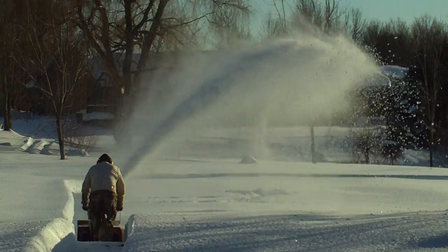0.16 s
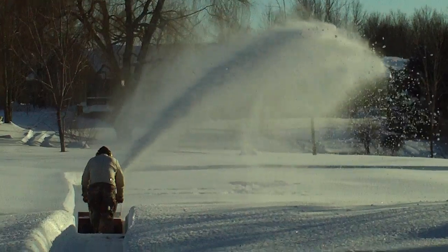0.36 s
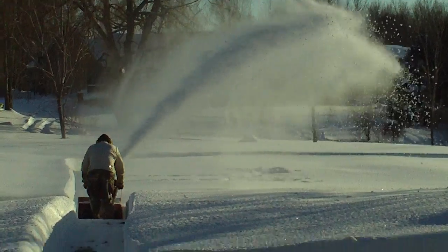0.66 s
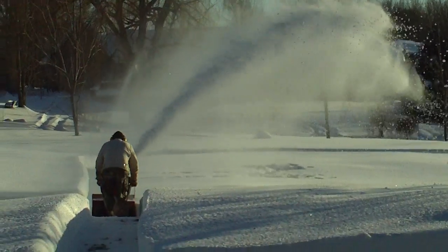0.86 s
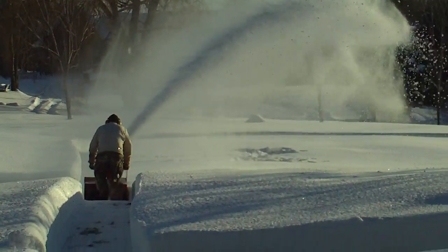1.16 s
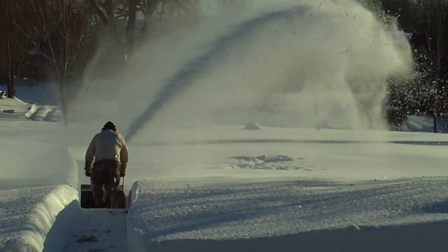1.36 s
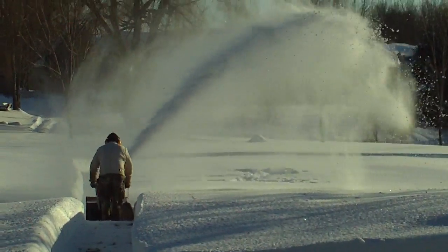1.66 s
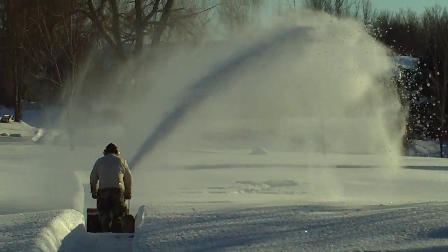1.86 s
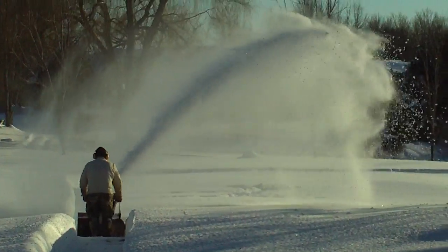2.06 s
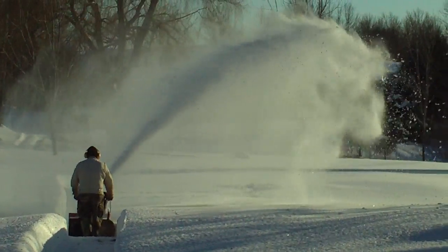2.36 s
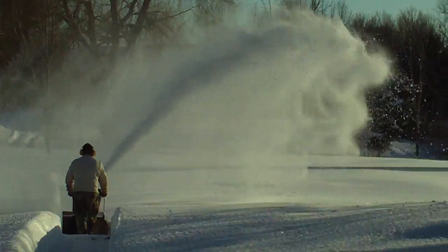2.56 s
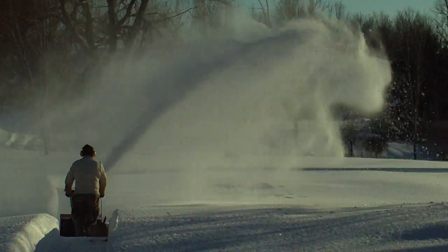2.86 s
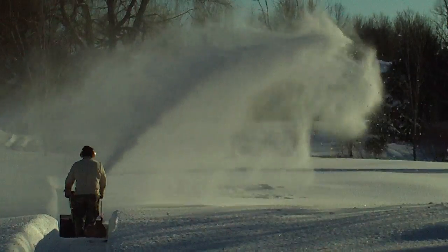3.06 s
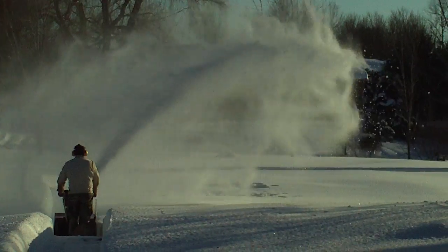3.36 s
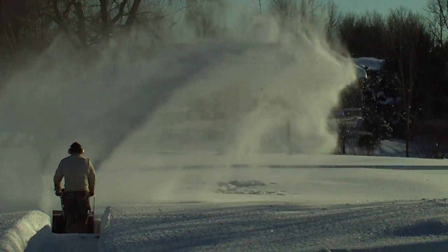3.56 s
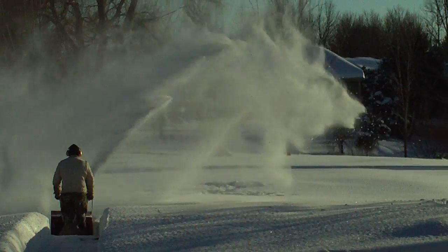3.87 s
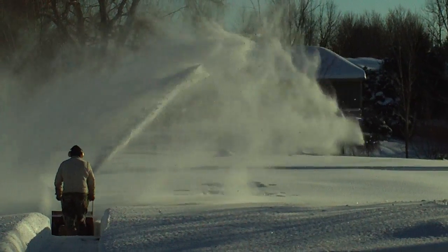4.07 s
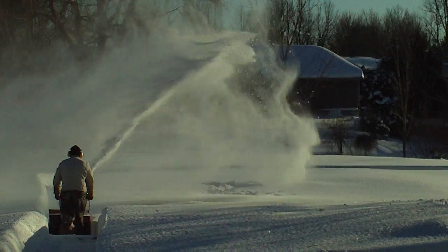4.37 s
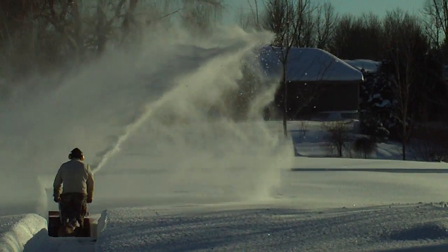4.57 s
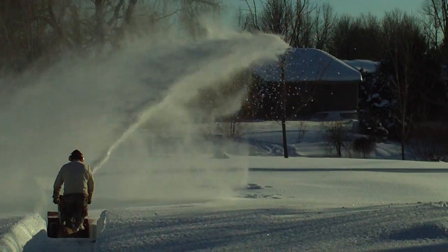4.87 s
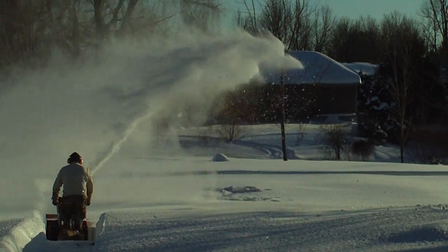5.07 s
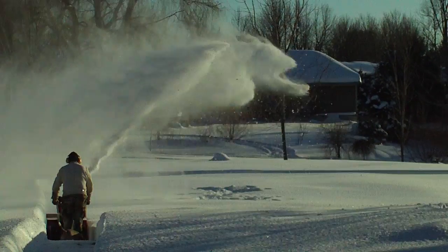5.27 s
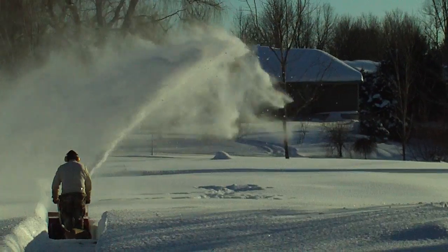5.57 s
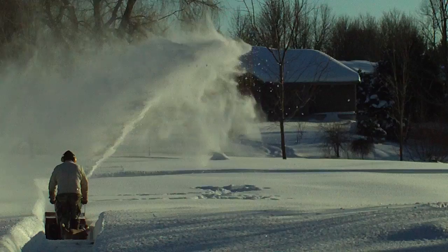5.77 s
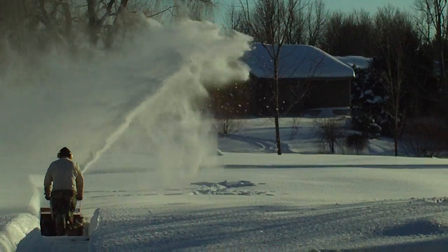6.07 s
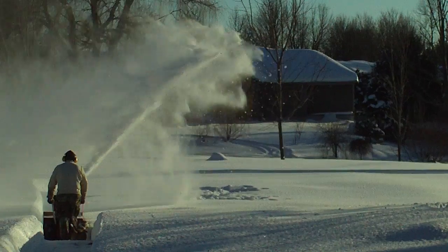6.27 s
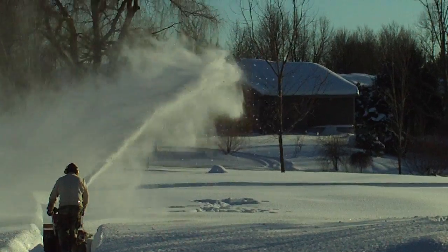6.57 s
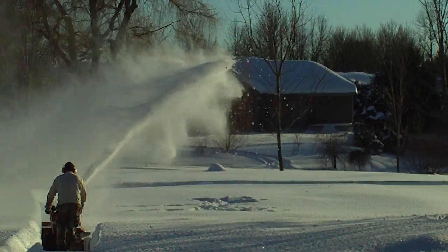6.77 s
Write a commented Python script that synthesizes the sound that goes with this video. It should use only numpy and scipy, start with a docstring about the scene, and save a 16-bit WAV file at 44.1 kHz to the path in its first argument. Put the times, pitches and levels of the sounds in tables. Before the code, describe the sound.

A snowblower's small petrol engine drones steadily, churning and spraying snow, with two sharp close clicks early on and light wind gusts.

```python
"""A throbbing engine drone is heard first: a walk-behind snowblower, some way off in a snowy yard.
Its one-cylinder four-stroke engine excites the resonances of a muffler, its fan whines and its impeller
beats against the exhaust note. The auger churns; snow hisses from the chute and ice pings its steel.
Close by, light gusts rumble, a metal catch clicks, something rustles and a plastic casing snaps."""
import sys
import numpy as np
from scipy import signal
from scipy.fft import rfft, irfft, next_fast_len
from scipy.io import wavfile
from scipy.ndimage import uniform_filter1d

SR = 44100
rng = np.random.default_rng(int(sys.argv[2]) if len(sys.argv) > 2 else 0)


def unload_audio(sound):
    """Save the sound as a 16-bit wav file, at the path given as the first command line argument."""
    columns = np.transpose(np.atleast_2d(sound))
    # keep every value between -1 and 1, then stretch to whole-number steps
    steps = np.round(np.clip(columns, -1, 1) * 32767)
    wavfile.write(sys.argv[1], SR, steps.astype(np.int16))


N = 305613
TIME = np.arange(N) / SR

# engine speed, dipping and recovering with the load: (time [s], firing rate [Hz])
ENGINE_SPEED = [(0.0, 26.423), (0.45, 27.355), (0.83, 26.705), (0.98, 27.152), (3.6, 27.729),
                (3.74, 28.136), (4.0, 27.39), (4.44, 27.822), (5.43, 27.656), (5.58, 27.85), (6.93, 27.831)]
# low exhaust harmonics: (multiple of the firing rate [-], level [dB])
THUD_HARMONICS = [(1, -42.5), (2, -35.5), (3, -64.5), (4, -39.5), (5, -37.5)]
# upper exhaust harmonics: (multiple of the firing rate [-], relative level [dB])
DRONE_HARMONICS = [(6, -45), (7, -49), (8, -40), (9, -47), (10, -62.5), (11, -49), (12, -53.5), (13, -59.5),
                   (15, -58)]
# gain of those upper harmonics: (time [s], gain [dB])
DRONE_GAIN = [(0, 0), (1.1, -2.5), (1.95, 1), (2.7, -2), (3.8, 0), (4.15, -4.5), (4.9, -1), (5.45, -3.5),
              (5.72, 1), (6.3, -2), (6.93, -2)]
# firings that pop harder than the rest: (time [s], relative level of the extra pop [dB])
EXTRA_POPS = [(.608, -8.5), (2.771, 3), (2.88, -9), (2.917, -3), (4.07, -6.5), (4.145, 0), (5.323, 5.5),
              (5.694, 6), (6.341, 3.5), (6.412, 1), (6.915, -4)]
# how hard the exhaust barks under load: (time [s], bark index [-])
EXHAUST_BARK = [(0.0, -41.5), (0.91, -38), (1.81, -46.5), (2.04, -41.5), (2.6, -42), (2.94, -38),
                (3.08, -43), (3.22, -42.5), (3.37, -43.9), (3.81, -42), (4.08, -44), (4.81, -47),
                (5.39, -39), (5.84, -46.5), (5.99, -40.5), (6.64, -43.5), (6.93, -26)]
# rushing gas: (frequency [Hz], gain [dB])
RASP_SPECTRUM = [(700, -18.5), (1300, 1.5), (2400, -6), (4000, -16), (5500, -14), (6500, -37)]
# muffler resonances: (frequency [Hz], bandwidth [Hz], gain [dB])
MUFFLER_MODES = [(944, 50, 1), (873.4, 81, 2), (690, 810, -7.5), (1060, 110, -19)]
# muffler transmission: (frequency [Hz], gain [dB])
MUFFLER_SPECTRUM = [(300, -8.0), (700, 3.0), (1100, 0.5), (1600, -16.5), (3000, -8.0), (6000, -60)]
# fan whine: (time [s], level [dB])
FAN_LEVEL = [(0, -53.5), (.6, -47), (1.2, -50), (1.9, -54.5), (2.4, -40.5), (2.65, -46.5), (2.95, -40),
             (3.2, -43), (3.4, -56), (3.75, -41.5), (4.05, -52), (4.8, -44.5), (5.3, -46.5), (5.62, -49.5),
             (6.08, -42.5), (6.45, -46.5), (6.7, -47.5), (6.9, -48)]
# piston and valve knocks: (place in the cycle [turns], relative level [dB])
VALVE_KNOCKS = [(0.91, -6), (0.5, 1), (.7, 2), (1, -11.5)]
# their metallic clatter: (frequency [Hz], gain [dB])
CLATTER_SPECTRUM = [(600, -22), (1300, 11.5), (2700, 8), (3200, 3), (3750, 10), (4300, 3), (5400, 7),
                    (5750, -7), (6100, -7), (6450, -15), (6800, -33)]
# impeller tone: (multiple of the blade rate [-], level [dB])
IMPELLER_HARMONICS = [(1, -39), (2, -85), (3, -63.5)]
# churning snow: (frequency [Hz], gain [dB])
CHURN_SPECTRUM = [(10, -2.5), (22, -0.5), (42, -3), (62, -1.5), (90, -7.5), (180, -3.5), (260, -4),
                  (335, -3), (400, -9), (480, -9), (560, -18.5), (750, -12.5), (1200, -20), (2500, -50)]
# bites into packed snow: (time [s], level [dB], half-width [s])
AUGER_BITES = [(2.303, -42.5, 0.13), (3.977, -41, 0.058), (5.694, -39, 0.041), (6.832, -46, 0.13)]
# snow leaving the chute, swelling as the auger bites: (time [s], flow index [-])
SNOW_FLOW = [(0, 1), (2.15, -1.5), (3, 5), (4.9, 2), (6.03, 6), (6.5, 0.5), (6.76, 2), (6.93, 8)]
# hiss of thrown snow: (frequency [Hz], gain [dB])
SPRAY_SPECTRUM = [(400, -8), (1100, 4), (1500, 2.5), (2200, 2.5), (2900, -2), (3150, -3.5), (3550, -5),
                  (3750, -4), (4200, -5.5), (5000, -3.5), (5650, -16), (6100, -19.5), (6450, -29),
                  (6900, -37)]
# sheet steel of the chute: (frequency [Hz], bandwidth [Hz], relative level [dB])
CHUTE_MODES = [(2040, 110, -8.5), (2830, 60, 5.5), (3760, 160, 4.5), (5015, 160, 3.5), (5420, 230, 5.5)]
# ice in the thrown snow: (time [s], relative level [dB])
ICE_LEVEL = [(0, -52.5), (.17, -51), (.48, -53.5), (1.2, -58.5), (1.65, -53.5), (2.18, -58.5), (2.36, -55),
             (2.98, -52), (3.4, -52.5), (3.9, -56.5), (4.08, -56), (4.5, -66), (4.9, -63), (5.2, -60),
             (5.55, -57.5), (5.97, -51), (6.55, -61), (6.9, -53)]
# tone colour of its pings: (frequency [Hz], gain [dB])
ICE_SPECTRUM = [(1000, -9.5), (2000, 0.5), (5700, 0.5), (6200, -25.5), (7000, -25.5)]
# stronger gusts: (time [s], relative level [dB], half-width [s])
GUST_SWELLS = [(0.163, -31, 0.11), (0.65, -25.5, 0.053), (0.808, -28.5, 0.18), (1.428, -26, 0.071),
               (2.432, -26.5, 0.015), (2.747, -24.5, 0.018), (3.38, -22, 0.032), (4.055, -24.5, 0.037),
               (5.967, -26.5, 0.038), (6.632, -30, 0.059), (6.808, -32, 0.087)]
# wind eddies: (frequency [Hz], gain [dB])
EDDY_SPECTRUM = [(4, -19.5), (14, 4), (30, -4.5), (60, -8.5), (130, -12), (300, -33), (900, -63.5)]
# their rumble: (frequency [Hz], gain [dB])
RUMBLE_SPECTRUM = [(100, 2.5), (400, -1.5), (1200, -47.5)]
# click, rebound and rattle of the catch: (time [s], gain [dB], relative push [dB])
CATCH_BLOWS = [(.8568, -16.5, 10), (.8585, -33, -6), (.877, -40, 3), (.8838, -42, -7)]
# metal catch on its mount: (frequency [Hz], gain [dB], decay time T60 [s])
CATCH_MODES = [(500, -12, 0.038), (710, -1, 0.025), (1180, -2.5, .014), (1680, -0.5, 0.012),
               (2380, -2, 0.016), (2780, 0, .011), (2990, 1, 0.012), (3330, -2, .01), (3560, -1, 0.014),
               (4340, -27, .011), (5090, -25, .012)]
# pings of its settling spring: (time [s], gain [dB], relative push [dB])
SPRING_BLOWS = [(.8832, -37, -4), (.8868, -30.5, -4)]
# the spring: (frequency [Hz], gain [dB], decay time T60 [s])
SPRING_MODES = [(1750, -3, 0.026), (2140, 3.5, 0.028), (2930, 1, .02), (4220, -3, 0.016)]
# brushing on the catch: (frequency [Hz], gain [dB])
RUSTLE_SPECTRUM = [(900, -36), (1700, 3), (2250, 13), (2900, -15), (5000, -37)]
# snap and rebounds of the casing: (time [s], gain [dB], relative push [dB])
CASING_BLOWS = [(1.4047, -7, -16), (1.4066, -22, -8), (1.4553, -36.5, -9)]
# plastic casing: (frequency [Hz], gain [dB], decay time T60 [s])
CASING_MODES = [(264, -7.5, 0.028), (490, -28, 0.025), (614, -22.5, 0.23), (1050, -6, 0.017),
                (1470, 9.5, 0.0056), (1810, 1.5, 0.0087), (2200, -5, 0.017), (2870, -21, 0.013),
                (3620, -15.5, 0.016), (4570, -15, 0.0068), (5330, -27, 0.0076)]
# ice chips striking the chute: (time [s], level [dB], frequency of the spot hit [Hz])
ICE_CHIPS = [(2.688, -45, 2830), (2.7235, -51, 2850), (2.9056, -52, 2810), (2.943, -47, 2210),
             (2.978, -44, 2880), (3.051, -45, 2830), (3.305, -48, 3750), (3.348, -43, 2000),
             (3.377, -46, 2980), (3.385, -41.5, 2900), (3.415, -43, 3770), (4.072, -43, 2800),
             (5.238, -49, 2800), (5.867, -55, 2830)]
# their scrape: (frequency [Hz], gain [dB])
SCRAPE_SPECTRUM = [(900, -12), (1900, -1.5), (5400, 8.5), (6100, -17), (7000, -31)]


def amp(db):
    """Amplitude grows tenfold for every 20 dB."""
    return 10 ** (np.asarray(db) / 20)


def unit(x):
    """Normalisation to rms 1."""
    return x / np.sqrt(np.mean(x ** 2) + 1e-20)


def curve(rows):
    """Linear interpolation of (time [s], value) rows."""
    return np.interp(TIME, *np.transpose(rows))


def swell(s, db, half_width_s):
    """A Gaussian envelope centred on time s."""
    return amp(db) * np.exp(-2 * ((TIME - s) / half_width_s) ** 2)


def add(mix, s, sound):
    """Superposition of a sound on the mix from time s."""
    part = mix[round(s * SR):][:len(sound)]
    part += sound[:len(part)]


def colour(x, spectrum):
    """Spectral shaping by (frequency [Hz], gain [dB]) rows; rms 1."""
    hz, db = np.transpose(spectrum)
    size = next_fast_len(N)
    bins = np.fft.rfftfreq(size, 1 / SR)
    gain = amp(np.interp(np.log(bins + 1), np.log(hz), db))
    return unit(irfft(rfft(x, size) * gain, size)[:N])


def drift(hz):
    """Low-pass noise: a slow random fluctuation of rms 1."""
    size = next_fast_len(N)
    bins = np.fft.rfftfreq(size, 1 / SR)
    return unit(irfft(rfft(rng.standard_normal(size)) / (1 + (bins / hz) ** 4), size)[:N])


def grains(per_s, spread_db):
    """Shot noise: sparse impulses of random size and sign; rms 1."""
    size = amp(spread_db * np.minimum(rng.exponential(1, N), 4)) * rng.choice([-1, 1], N)
    return unit(size * (rng.random(N) < per_s / SR))


def resonate(x, hz, width):
    """A damped resonator with gain 1 at its centre."""
    r = np.exp(-np.pi * width / SR)
    return (1 - r) * signal.lfilter([1, 0, -1], [1, -2 * r * np.cos(2 * np.pi * hz / SR), r * r], x)


def tones(turns, orders, lead):
    """Harmonic series of a rotation; radiation advances the phase of the lowest orders most."""
    return np.sqrt(2) * sum(amp(db) * np.cos(2 * np.pi * k * turns + np.arctan(lead / k))
                            for k, db in orders)


def per_cycle(turns, spread_db):
    """Cycle-to-cycle variation: a random gain, renewed at each half-way point."""
    return amp(spread_db * rng.standard_normal(N)[np.round(turns).astype(int)])


def firing_rate(hunt_hz=1.63, swing_hz=.12, crest_s=.061):
    """Governor hunting: the firing rate [Hz] oscillates gently about the engine's speed curve."""
    return curve(ENGINE_SPEED) + swing_hz * np.cos(2 * np.pi * hunt_hz * (TIME - crest_s))


def exhaust(turns):
    """Periodic excitation: each firing gives a thud, a pop and a gas puff; the last two ring the can."""
    strength = uniform_filter1d(per_cycle(turns, spread_db=0.28), size=200)
    thud = tones(turns, THUD_HARMONICS, lead=2.3)
    drone = amp(curve(DRONE_GAIN)) * tones(turns, DRONE_HARMONICS, lead=1.3)
    pops = np.diff(np.floor(turns), prepend=0) * per_cycle(turns, spread_db=1.6)
    pops *= 0.83 + sum(swell(s, db, half_width_s=0.012) for s, db in EXTRA_POPS)
    rush = np.exp(-(turns % 1) / 0.24)  # gas flows hardest as the valve opens
    puffs = (1 + 0.21 * rush) * rng.standard_normal(N)
    bark = curve(EXHAUST_BARK)
    rasp = amp(0.5 * bark - 37.5) * colour(rush * rng.standard_normal(N), RASP_SPECTRUM)
    ring = amp(0.63 * bark - 22.0) * muffler(pops)
    breath = amp(0.53 * bark - 19.0) * muffler(puffs)
    return strength * (thud + drone) + ring + rasp + breath


def muffler(drive):
    """Resonant filtering: the can rings at its modes and attenuates the treble; rms 1."""
    ring = sum(amp(db) * resonate(drive, hz, width) for hz, width, db in MUFFLER_MODES)
    return colour(ring, MUFFLER_SPECTRUM)


def fan(turns, blades_per_firing=34):
    """Modulation: the crank-locked fan's tone wavers with each power stroke and flutters in the draught."""
    waver = 1.05 * np.sin(2 * np.pi * (turns - .1))
    phase = 2 * np.pi * blades_per_firing * turns + waver + .25 * drift(hz=4.)
    throb = 1 - .3 * np.cos(2 * np.pi * turns)
    return amp(curve(FAN_LEVEL) + .8 * drift(hz=6.)) * unit(throb * np.cos(phase))


def valves(turns, decay_turns=0.15):
    """Impact noise: piston and valves knock at set places in every cycle."""
    bursts = sum(amp(db) * per_cycle(turns - place, spread_db=3.5)
                 * np.exp(-((turns - place) % 1) / decay_turns) for place, db in VALVE_KNOCKS)
    clatter = colour(bursts * rng.standard_normal(N), CLATTER_SPECTRUM)
    return amp(-55.5 + .5 * curve(SNOW_FLOW)) * clatter


def impeller(rate, blades_per_firing=2.4804, belt_slip=.0201, grip_s=2.06):
    """Beating: belt-driven blades push air at their own rate and throb against the engine's note."""
    grip = 1 - belt_slip * np.exp(-TIME / grip_s)
    passes = np.cumsum(blades_per_firing * grip * rate) / SR + .445
    return amp(1.5 * drift(hz=6.4)) * tones(passes, IMPELLER_HARMONICS, lead=.05)


def auger(turns, housing_hz=340, width_hz=60):
    """Forced vibration: lumps of snow thump through the housing, which booms on a hard bite."""
    lumps = grains(per_s=600, spread_db=3.0) + 1.45 * rng.standard_normal(N)
    gulp = 1 + 0.32 * np.cos(np.pi * (turns - .45)) ** 8  # the intake gulps once a cycle
    housing = unit(resonate(resonate(lumps, housing_hz, width_hz), housing_hz, 4 * width_hz))
    boom = sum(swell(*bite) for bite in AUGER_BITES) * housing
    return boom + amp(-36.0 + 0.92 * drift(hz=8.0)) * colour(lumps * gulp, CHURN_SPECTRUM)


def spray():
    """Random impacts: snow scours the chute in hissing spurts, and ice grains excite its steel modes."""
    fizz = grains(per_s=6600, spread_db=-1.0) + 1.2 * rng.standard_normal(N)
    pings = sum(amp(db) * unit(resonate(grains(per_s=300, spread_db=2.0), hz, width))
                for hz, width, db in CHUTE_MODES)
    hiss = amp(-49.0 + 0.5 * curve(SNOW_FLOW) + 0.4 * drift(hz=5.7)) * colour(fizz, SPRAY_SPECTRUM)
    return hiss + amp(curve(ICE_LEVEL) - 1.0) * colour(pings, ICE_SPECTRUM)


def gusts(breeze_db=-43, spread_db=1.5):
    """Turbulence: brief eddies buffet the microphone over a faint, restless breeze."""
    eddies = signal.hilbert(colour(rng.standard_normal(N), EDDY_SPECTRUM))
    evened = eddies.real / np.sqrt(abs(eddies) ** 2 + 0.97)  # compresses the envelope
    breeze = amp(breeze_db + spread_db * drift(hz=5.5))
    return colour(evened, RUMBLE_SPECTRUM) * (breeze + sum(swell(*gust) for gust in GUST_SWELLS))


def strikes(blows, modes, contact_samples=10):
    """Impulse response: each chattering blow rings the modes, and the body gives with a low push."""
    out, t = np.zeros(N), np.arange(4096) / SR
    ring = sum(amp(db - 60 * t / t60) * np.sin(2 * np.pi * hz * t) for hz, db, t60 in modes)
    for s, db, push_db in blows:
        force = 0.0085 * rng.standard_normal(len(t)) * np.exp(-t / 0.0046)
        force[:contact_samples] = unit(np.hanning(contact_samples)) / contact_samples
        push = amp(push_db) * (np.exp(-t / 0.0033) - np.exp(-t / 0.0053))
        add(out, s, amp(db) * (signal.fftconvolve(force, ring)[:len(t)] + push))
    return out


def catch():
    """Free vibration: a metal catch clicks and rattles, and its spring pings as it settles."""
    return strikes(CATCH_BLOWS, CATCH_MODES) + strikes(SPRING_BLOWS, SPRING_MODES)


def rustle():
    """Friction: something brushes the catch and makes its spring ring faintly."""
    brush = colour(rng.standard_normal(N), RUSTLE_SPECTRUM)
    slips = grains(per_s=710, spread_db=-1.0)
    ring = unit(sum(amp(db) * resonate(slips, hz, width=2.2 / t60) for hz, db, t60 in SPRING_MODES))
    return swell(s=1.194, db=-46.5, half_width_s=0.1) * (brush + 0.44 * ring)


def snap():
    """Heavy damping: the plastic casing snaps and rebounds, and its strong modes die quickly."""
    return strikes(CASING_BLOWS, CASING_MODES)


def chips(decay_s=0.0049, width_hz=240):
    """Transient excitation: each ice chip briefly scrapes the chute and rings the spot it hits."""
    scrape = colour(rng.standard_normal(N), SCRAPE_SPECTRUM)
    return sum(amp(db) * (TIME >= s) * np.exp(-abs(TIME - s) / decay_s)
               * unit(resonate(scrape, hz, width_hz)) for s, db, hz in ICE_CHIPS)


def scene():
    """Absorption: open snow swallows reflections, so only the direct sounds add."""
    rate = firing_rate()
    turns = np.cumsum(rate) / SR + .582  # one turn is one firing cycle
    engine = exhaust(turns) + fan(turns) + valves(turns)
    snow_work = impeller(rate) + auger(turns) + spray() + chips()
    nearby = gusts() + rustle() + catch() + snap()
    return (engine + snow_work + nearby)[None]


def record(dry, ceiling=.94, top_hz=7090):
    """Soft saturation rounds the sharpest peak; a low-pass filter narrows the mono band."""
    rounded = dry / (1 + (dry / ceiling) ** 8) ** (1 / 8)
    low_pass = signal.firwin(401, top_hz, window=("kaiser", 9), fs=SR)
    return signal.oaconvolve(rounded, low_pass[None], "same")


dry = scene()
out = record(dry)
unload_audio(out)
```